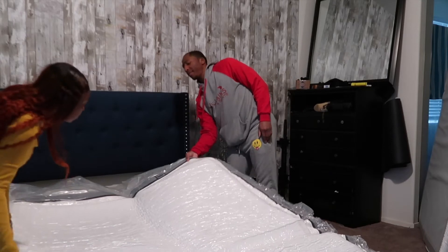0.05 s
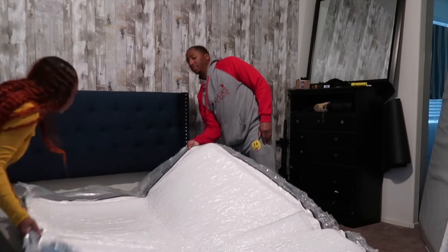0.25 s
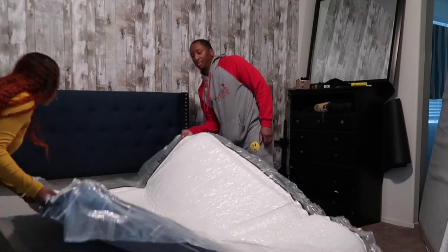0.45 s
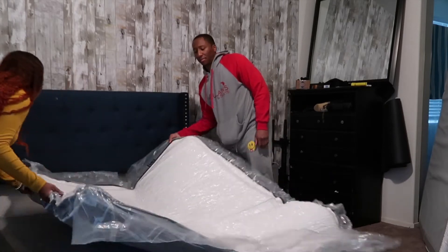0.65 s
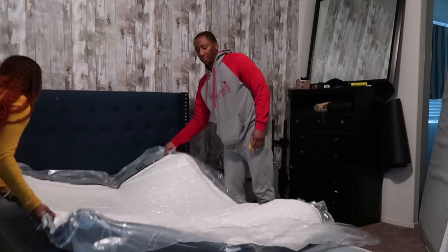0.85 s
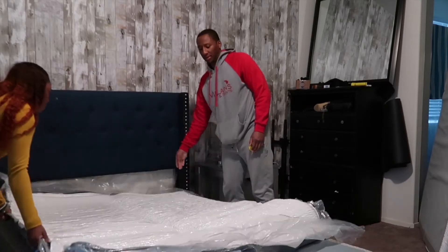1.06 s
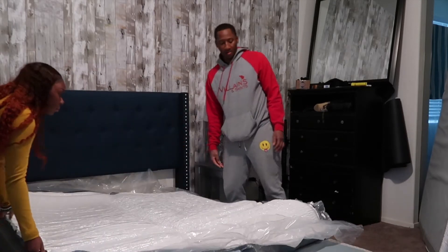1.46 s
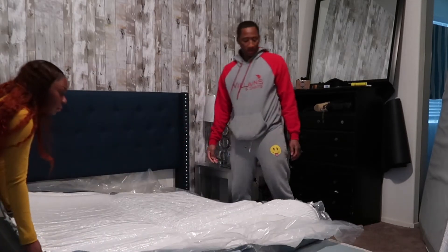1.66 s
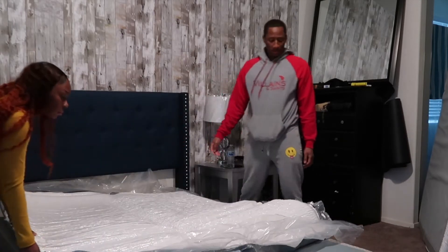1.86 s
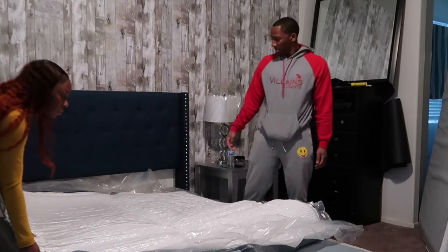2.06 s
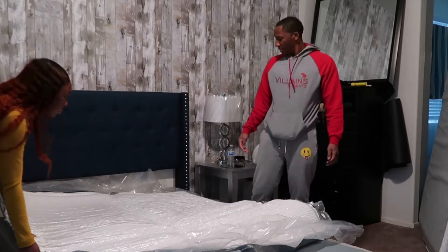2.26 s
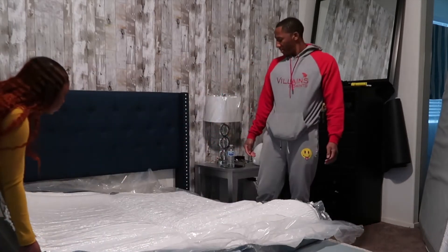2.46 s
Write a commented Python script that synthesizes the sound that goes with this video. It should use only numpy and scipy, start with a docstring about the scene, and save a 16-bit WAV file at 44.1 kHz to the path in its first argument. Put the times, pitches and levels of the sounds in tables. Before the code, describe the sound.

Crinkling, snapping plastic on a mattress settling with soft thumps, leaving a thin hiss.

```python
"""A small bedroom, a stereo pair of microphones on a foam mattress being let down onto the bed.
Its loose plastic wrap crinkles and snaps as creases buckle, the slack sheet billows and flops
over the air beneath, and the foam drags and lands with a soft thump. A hiss with a thin,
sinking whistle remains, likely air drawn into the swelling foam, over faint room hum."""
import sys
import numpy as np
from scipy import signal
from scipy.fft import rfft, irfft
from scipy.io import wavfile
from scipy.ndimage import uniform_filter1d

SR = 44100
rng = np.random.default_rng(int(sys.argv[2]) if len(sys.argv) > 2 else 0)


def pcm_store(signal):
    """Save signal as 16-bit PCM."""
    levels = np.round(np.clip(np.atleast_2d(signal), -1, 1) * 32767)
    wavfile.write(sys.argv[1], SR, levels.astype(np.int16).T)


N = 110250

# spectrum of the plastic film: frequency_hz, level_db
FILM_SPECTRUM = [(150, -30.5), (500, 1), (900, -2), (1400, -1.5), (2400, -1.5), (3600, -5.5), (5000, -13),
                 (6500, -18), (10000, -31), (12500, -60), (15000, -87)]
# low modes of the bed: pitch_hz, width_hz, gain_db
BED_MODES = [(45.5, 14.7, 3), (118.8, 14.6, -3.5)]
CREASE_SPREAD_DB, WHISTLE_FLICKER_DB = 3.5, 2


def undb(db):
    """Decibels to gain."""
    return 10 ** (np.asarray(db) / 20)


def unit(x):
    """Scale to rms 1."""
    return x / np.sqrt(np.mean(x ** 2))


def curve(rows, column=1):
    """One column of a time table, joined by straight lines."""
    rows = np.array(rows)
    return np.interp(np.arange(N) / SR, rows[:, 0], rows[:, column])


def response(spectrum, peaks=()):
    """Causal filter from a spectrum with resonances on top."""
    hz = np.maximum(np.arange(N // 2 + 1) * SR / N, 1)
    spectrum = np.array(spectrum)
    gain = undb(np.interp(np.log(hz), np.log(spectrum[:, 0]), spectrum[:, 1]))
    for centre, width, db in peaks:
        gain = gain * undb(db / (1 + (2 * (hz - centre) / width) ** 2))
    cepstrum = irfft(np.log(gain), N)
    return np.exp(rfft(np.r_[cepstrum[0], 2 * cepstrum[1:N // 2]], N))


def colour(x, spectrum, peaks=()):
    """Filter a broadband sound, keeping its power."""
    gain = response(spectrum, peaks)
    return irfft(rfft(x) * gain, N) / np.sqrt(np.mean(np.abs(gain) ** 2))


def wander(rate_hz):
    """Smooth random wander, rms 1."""
    hold = int(SR / rate_hz)
    steps = np.repeat(rng.standard_normal(N // hold + 1), hold)
    return unit(uniform_filter1d(steps, hold)[:N])


def clicks(per_s, spread_db):
    """Random clicks of uneven size, rms 1."""
    size = undb(spread_db * np.minimum(rng.exponential(size=N), np.pi))
    return unit((rng.random(N) < per_s / SR) * size * np.sign(rng.standard_normal(N)))


def tone(hz, waver, rate_hz):
    """A sine whose pitch wanders by the share waver; rms 1."""
    return unit(np.sin(2 * np.pi * np.cumsum(hz * (1 + waver * wander(rate_hz))) / SR))


def room_hum():
    """The bedroom's low background noise with a faint hum in it."""
    # background: frequency_hz, level_db
    spectrum = [(20, -11), (36, -6.5), (48, 1.5), (68, -9), (120, -7), (170, -13.5), (260, -20),
                (370, -15.5), (480, -21.5), (1200, -21.5), (5000, -46), (15000, -49)]
    # hum: pitch_hz, width_hz, gain_db
    peaks = [(52.5, 7, 13.5), (117.3, 14, 6.5), (254.8, 33, 21.5), (300, 4.9, 24.5), (361.6, 18, 9)]
    return undb(-48) * colour(rng.standard_normal(N), spectrum, peaks)


def room_air():
    """Diffuse room air, unlike at the two microphones."""
    # air: frequency_hz, level_db
    spectrum = [(30, -11), (130, -8.5), (270, 8.5), (500, 4.5), (1000, -0.5), (2000, -4), (3200, -21),
                (6000, -29), (15000, -42)]
    return undb(-58) * colour(rng.standard_normal(N), spectrum)


def crinkle():
    """Tiny creases buckle while film slides over film."""
    # crinkling: time_s, level_db
    swell = [(0, -40), (.1, -41), (.18, -42), (.2, -36), (.26, -40.5), (.3, -36.5), (.35, -37), (.4, -35.5),
             (.45, -34), (.505, -30.5), (.56, -28.5), (.61, -31), (.7, -28.5), (.75, -28.5), (.8, -30),
             (.84, -29.5), (.95, -32), (1.0, -28), (1.04, -25.5), (1.06, -24), (1.115, -25.5), (1.15, -32),
             (1.22, -31.5), (1.28, -44.5), (1.34, -46.5), (1.42, -51.5), (1.55, -65)]
    creases = clicks(per_s=2200, spread_db=CREASE_SPREAD_DB)
    slide = undb(-2.5) * rng.standard_normal(N)
    flicker_db = 1.36 * wander(69.74)
    return colour(unit(creases + slide) * undb(curve(swell) + .5 + flicker_db), FILM_SPECTRUM)


def billow():
    """Broad folds of the slack sheet flap and ring the hollow beneath."""
    # billowing: time_s, level_db
    swell = [(0, -42.5), (.12, -41), (.3, -36.5), (.45, -33), (.52, -31), (.605, -31.5), (.65, -26.5),
             (.7, -28), (.77, -27.5), (.84, -29.5), (.9, -29.5), (.95, -35), (1.02, -27.5), (1.06, -26),
             (1.12, -24), (1.16, -29), (1.24, -33.5), (1.29, -44), (1.46, -50.5), (1.55, -52), (1.9, -53.5)]
    # sheet: frequency_hz, level_db
    spectrum = [(25, -79), (70, -8.5), (130, -1.5), (220, 2), (330, 0), (480, -4.5), (700, -20),
                (1500, -27), (5000, -65)]
    # resonances of the sheet and the air under it: pitch_hz, width_hz, gain_db
    hollow = [(141, 20, 1.5), (208, 40, 5.5), (263.4, 28, 3), (298, 37, 4.5), (399.6, 59, 6.5),
              (459.5, 31, 4.5)]
    flaps = clicks(per_s=500, spread_db=-2.5)
    return colour(flaps * undb(curve(swell) - .5), spectrum, hollow)


def drag():
    """Foam rubbing along the bed keeps the bed's upper mode droning."""
    # drone: time_s, level_db
    swell = [(0, -60), (.1, -49), (.15, -43.5), (.33, -38), (.42, -50), (.6, -66), (1.1, -37), (1.24, -46),
             (1.33, -55), (1.5, -74)]
    hz, width, _ = BED_MODES[1]
    return tone(hz, waver=width / hz / 2, rate_hz=51.5) * undb(curve(swell) + 2 * wander(29.4))


def inrush():
    """Air hisses in through a narrow opening, which rings roughly once the mattress lies flat."""
    # air drawn through the wrap: time_s, level_db
    draught = [(0, -53), (1.2, -44), (1.5, -45.5), (1.8, -45), (2.3, -46.5), (2.5, -45)]
    # hiss: frequency_hz, level_db
    spectrum = [(200, -26), (700, -5.5), (1150, -3.5), (1600, 1.5), (2600, 3.5), (3800, 1), (4900, -4.5),
                (5800, -12), (9500, -18.5), (12500, -42), (15000, -68)]
    # resonances of the opening: pitch_hz, width_hz, gain_db
    slit = [(1500, 210, 5), (1650, 16, 3), (1880, 27, 4.5), (2350, 270, 2), (2630, 47, -5), (2700, 67, 6.5),
            (3373, 40, 4.5)]
    # ring of the opening: time_s, level_db
    ring_swell = [(0, -78), (1.4, -60), (1.75, -55), (2.35, -53.5), (2.5, -65)]
    hiss = colour(rng.standard_normal(N), spectrum, slit) * undb(curve(draught) - wander(13))
    ring = unit(tone(hz=1523, waver=.0298, rate_hz=200) * undb(WHISTLE_FLICKER_DB * wander(90)))
    return hiss + ring * undb(curve(ring_swell))


def snaps():
    """A large crease flips with a crack and sets off a brief crackle."""
    # creases snapping through: start_s, level_db, tilt_db_per_octave, crackle_db
    creases = [(.0418, -23.5, 2, -2), (.1248, -21, 2, -3), (.1948, -24, -7, -1), (.2429, -21, 1.5, -9),
               (.2903, -22.5, 1, -4), (.3975, -13, -1, -5), (.4884, -13, -3, -9), (.5003, -23, -9, -7),
               (.508, -16.5, -2.5, -2), (.6966, -24.5, 8, 7), (.7862, -20, -5.5, 1), (.8, -23, -1, -1),
               (.8855, -23.5, 9.5, 3), (.9998, -12.5, 5.5, -1.5), (1.006, -19, 10, 2),
               (1.0445, -9.5, 0, 3.5), (1.047, -8.5, -1.5, -11.5), (1.0497, -10, 7, -8.5),
               (1.0707, -18, -2, 3), (1.105, -16, -0.5, 6), (1.109, -14, 3.5, 5), (1.121, -17, -1, -9),
               (1.1785, -18, -7.5, 3), (1.7786, -24.5, 3, -4)]
    # crack: frequency_hz, level_db
    spectrum = [(150, -25), (600, -13.5), (1400, 5.5), (2800, -1.5), (4600, -7.5), (6000, -15),
                (10000, -38), (15000, -77)]
    decay_s, gain = .0041, undb(-24) * np.sqrt(SR / 20)
    out, t = np.zeros(N), np.arange(N) / SR
    for start, db, tilt, crackle_db in creases:
        crackle = rng.standard_normal(N) * np.exp(-t / decay_s)
        crack = (t == 0) + undb(crackle_db) * crackle / np.linalg.norm(crackle)
        tilted = [(hz, level + tilt * np.log2(hz)) for hz, level in spectrum]
        out += gain * undb(db) * colour(np.roll(crack, int(start * SR)), tilted)
    return out


def bumps():
    """The foam presses softly on the bed and sets its low modes swaying."""
    # foam on the bed: middle_s, level_db, spread_s
    presses = [(0.053, -47, 0.035), (.228, -36, 0.022), (.405, -43, 0.011), (0.522, -36.5, 0.04),
               (0.7, -32.5, .022), (.825, -37, 0.026), (1.0, -41, .02), (1.125, -29.5, 0.015),
               (1.24, -43, .025)]
    out, t = np.zeros(N), np.arange(N) / SR
    for hz, width, mode_db in BED_MODES:
        sway = np.sin(2 * np.pi * np.cumsum(hz + width / 2 * wander(24.27)) / SR)
        for middle, db, spread in presses:
            out += undb(db + mode_db) * sway * np.exp(-.5 * ((t - middle) / spread) ** 2)
    return out


def crumples():
    """A patch of film collapses in a dense crackle around its own resonance."""
    # collapsing patches: middle_s, level_db, spread_s, resonance_hz
    patches = [(0.382, -34.5, .012, 1820), (.43, -39, .015, 1390), (0.509, -26, 0.008, 2330),
               (0.594, -38, .012, 1690), (0.801, -27.5, 0.013, 1330), (1.064, -24.5, 0.0073, 1580),
               (1.183, -34.5, .01, 1500), (1.333, -47.5, 0.018, 2760)]
    resonance_db = 13
    out, t = np.zeros(N), np.arange(N) / SR
    for middle, db, spread, hz in patches:
        swell = np.exp(-.5 * ((t - middle) / spread) ** 2)
        burst = clicks(per_s=1800, spread_db=CREASE_SPREAD_DB) * swell
        out += undb(db) * colour(burst, FILM_SPECTRUM, [(hz, hz / 2, resonance_db)])
    return out


def flops():
    """A broad fold slaps down and the air under it booms, sagging in pitch as the fold slackens."""
    # falling folds: start_s, pitch_hz, level_db, decay_s
    folds = [(0.566, 340, -27.5, 0.0095), (0.617, 209.5, -24, 0.04), (.626, 327.8, -29, 0.017),
             (.65, 127.6, -29, .05), (.72, 255, -27.5, 0.024), (.737, 121.8, -24.5, 0.028),
             (0.755, 300.6, -23, 0.02), (.775, 420, -27.5, 0.037), (.795, 133, -29, 0.018),
             (.81, 240, -30.5, 0.036), (0.874, 422, -24, 0.016), (0.884, 220, -29, 0.028),
             (0.989, 400.6, -24.5, 0.021), (1.006, 210.6, -22.5, 0.046), (1.011, 146.8, -31, 0.027),
             (1.039, 397, -21.5, 0.016), (1.05, 208, -18.5, .034), (1.099, 122.7, -22, 0.025),
             (1.154, 270, -28, 0.015), (1.681, 341, -42.5, 0.034)]
    rise_s, sag_per_s = .0064, .53
    out, t = np.zeros(N), np.arange(N) / SR
    for start, hz, db, decay in folds:
        age = np.maximum(t - start, 0)
        boom = tone(hz * np.exp(-sag_per_s * age), waver=.0248, rate_hz=80)
        out += undb(db) * boom * np.minimum(age / rise_s, np.exp((rise_s - age) / decay))
    return out


def flicks():
    """The film's loose edge whips through the air with a crisp fizz that swells and dies."""
    # whips of the edge: middle_s, level_db, spread_s
    whips = [(0.906, -50, 0.013), (.983, -44.5, .002), (1.0, -48, 0.021), (1.048, -39, .005),
             (1.1, -47, .02)]
    # fizz: frequency_hz, level_db
    spectrum = [(1000, -29), (4000, -8), (7500, -2), (10000, 0), (12500, -4), (15000, -35)]
    t = np.arange(N) / SR
    swell = sum(undb(db) * np.exp(-np.abs(t - middle) / spread) for middle, db, spread in whips)
    return colour(swell * rng.standard_normal(N), spectrum)


def whistle():
    """The opening whistles thinly, sinking as the draught eases."""
    # whistle: time_s, pitch_hz, level_db
    glide = [(1.42, 4150, -79), (1.47, 4080, -58), (1.555, 4040, -48.5), (1.6, 3990, -55),
             (1.69, 3976, -58), (1.8, 4016, -59), (1.86, 3890, -59), (1.96, 3910, -52), (2.08, 3863, -56),
             (2.17, 3860, -52), (2.38, 3776, -54), (2.44, 3805, -58), (2.5, 3830, -63)]
    note = tone(curve(glide), waver=.0045, rate_hz=200)
    flicker = undb(WHISTLE_FLICKER_DB * wander(90))
    return unit(note * flicker) * undb(curve(glide, column=2))


def room(x):
    """Direct sound and a short, dense tail from the near walls; the bass passes dry."""
    t60_s, gap_s, tail_db = .36, .003, -7
    t = np.arange(SR // 2) / SR
    tail = rng.standard_normal(len(t)) * np.exp(-np.log(1000) * t / t60_s) * (t > gap_s)
    tail = signal.sosfilt(signal.butter(2, 500, "high", fs=SR, output="sos"), tail)
    impulse = (t == 0) + undb(tail_db) * tail / np.linalg.norm(tail)
    return signal.fftconvolve(x, impulse / np.linalg.norm(impulse))[:N]


def scene():
    """The bedroom as mid and side at the microphones: bass in the centre, treble spread wide."""
    # width between the microphones: frequency_hz, side_gain_db
    width = [(60, -74), (200, -70), (400, -23), (800, -20), (1500, -24.5), (2400, -25.5), (3200, -14.5),
             (4400, -5.5), (7000, 1), (10000, 8), (14000, 38.5)]
    handling = snaps() + crumples() + flops() + bumps() + drag()
    whistling = whistle()
    # mid and side each get their own crinkle, billow, hiss and wall tail
    mid, side = (room(handling + crinkle() + billow() + inrush()) + whistling for _ in range(2))
    mid = mid + flicks() + room_hum()
    # a quarter-cycle turn of the side keeps left and right equally loud
    side = irfft(rfft(side) * 1j * np.abs(response(width)), N) + room_air()
    return np.array([mid + side, mid - side])


def record(dry):
    """The recorder cuts the top."""
    top_hz = 14500
    return signal.sosfilt(signal.ellip(8, .2, 70, top_hz, fs=SR, output="sos"), dry)


dry = scene()
out = record(dry)
pcm_store(out)
```